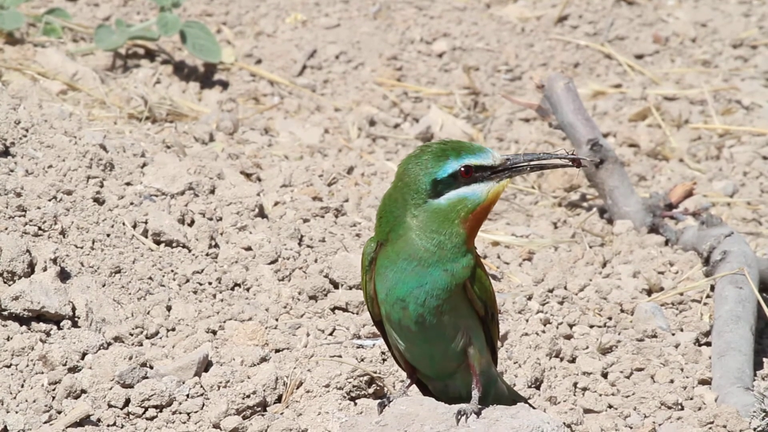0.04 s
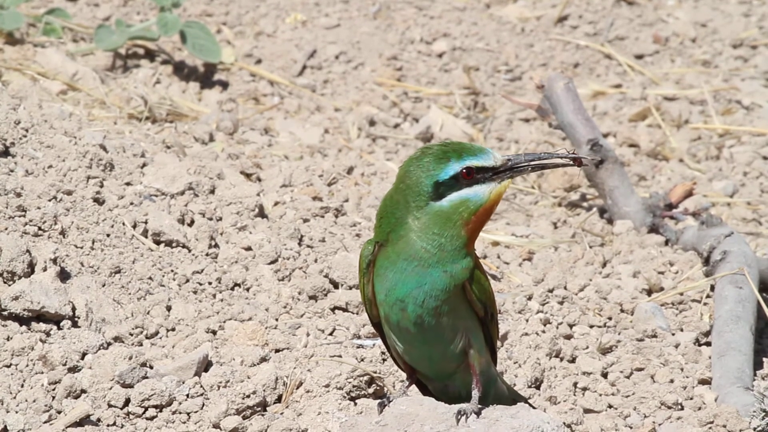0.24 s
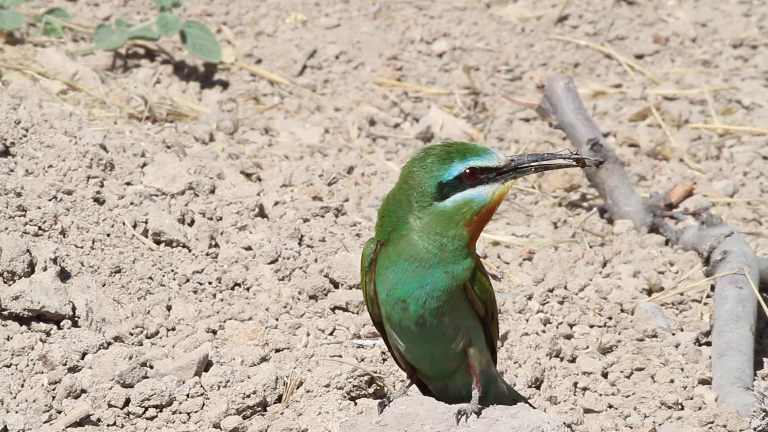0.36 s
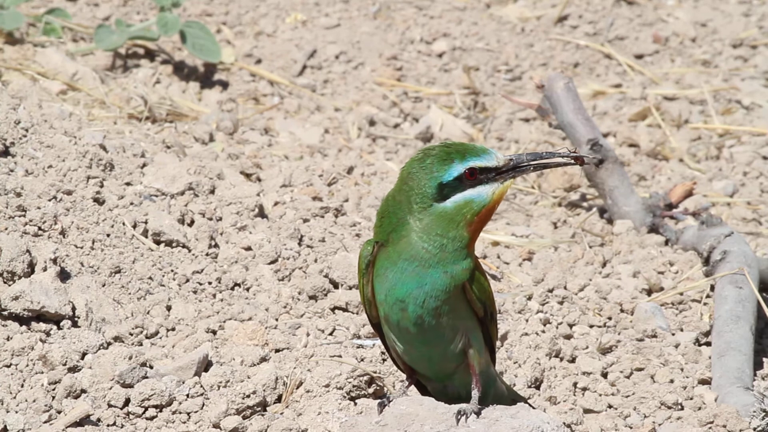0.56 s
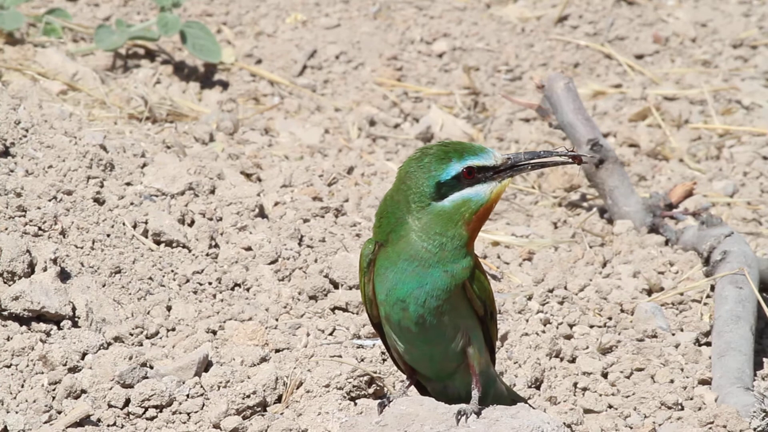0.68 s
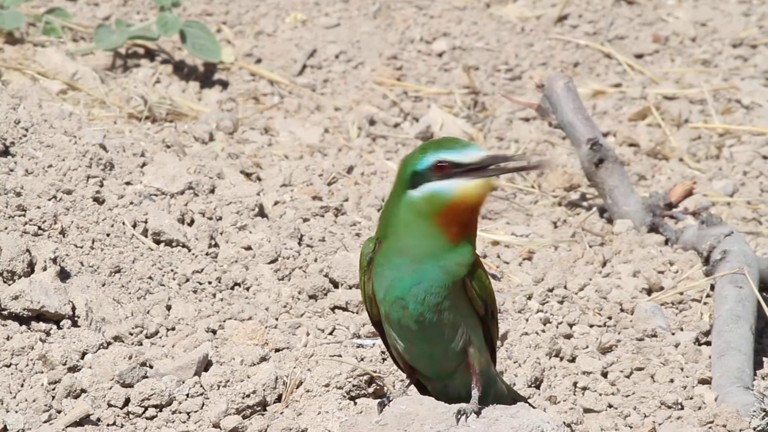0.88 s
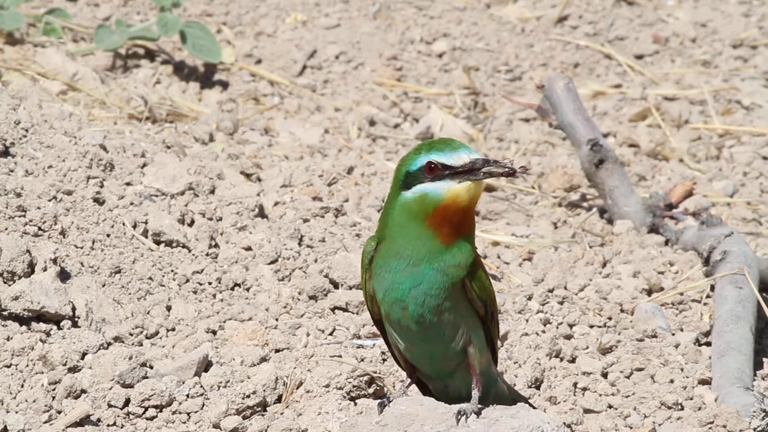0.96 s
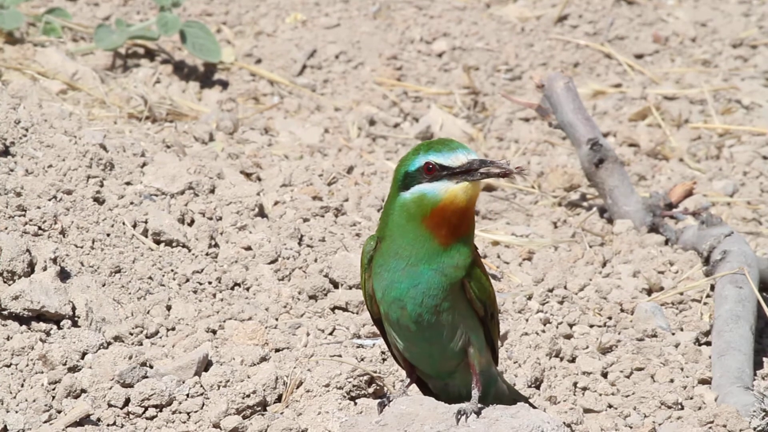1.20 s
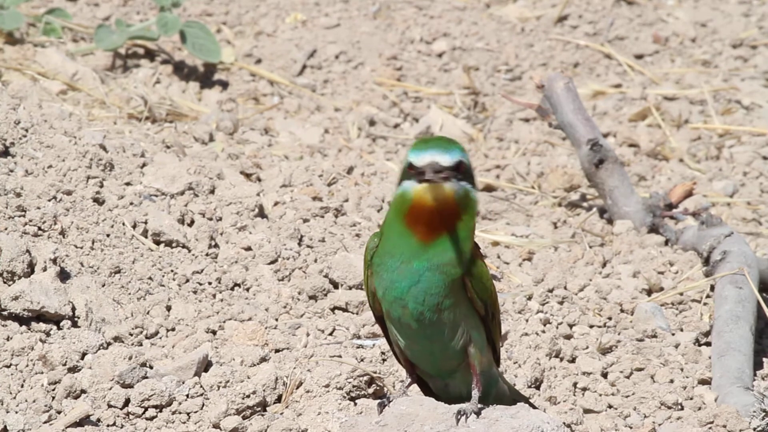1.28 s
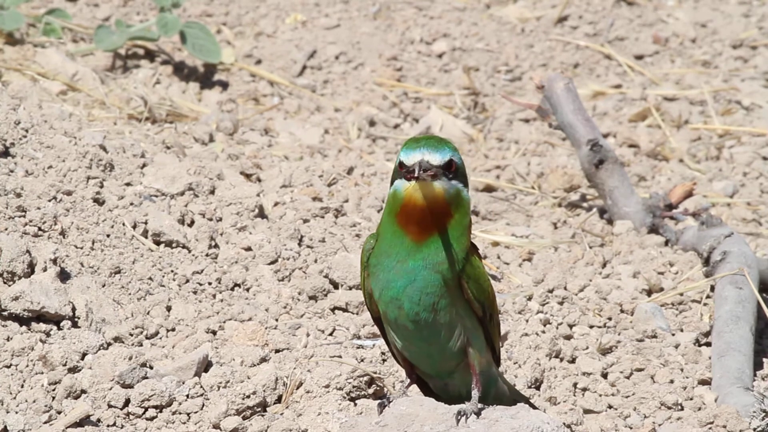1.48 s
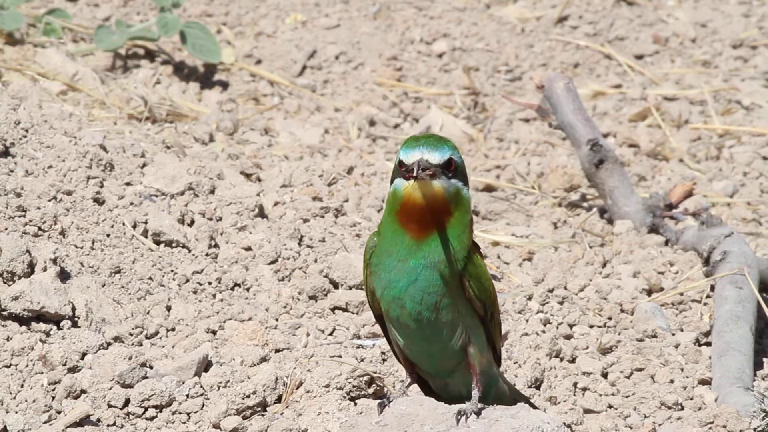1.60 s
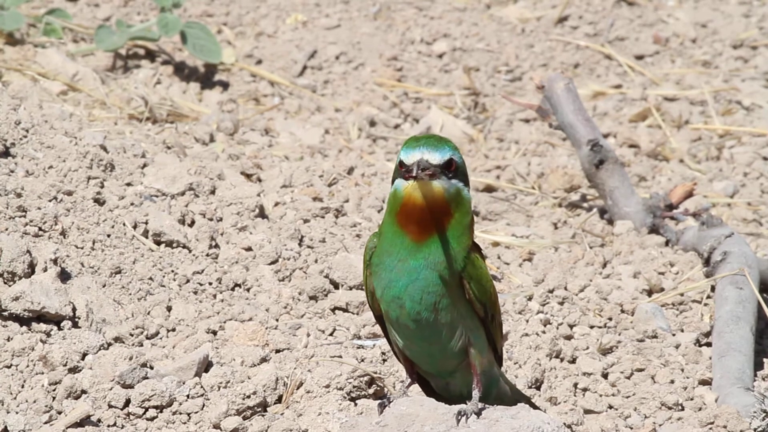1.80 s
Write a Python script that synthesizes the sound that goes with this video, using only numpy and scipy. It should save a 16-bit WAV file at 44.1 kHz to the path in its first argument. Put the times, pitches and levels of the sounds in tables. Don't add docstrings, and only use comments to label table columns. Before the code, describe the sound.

Close small bird sings three pairs of short raspy chirps, arcing up and down; between them a bee-eater gives two lower rolled whistles, with fainter answers and distant flock twitter, in a dry open field, mono microphone.

```python
import sys
import numpy as np
from scipy import signal
from scipy.fft import rfft, irfft
from scipy.io import wavfile
from scipy.ndimage import uniform_filter1d

SR = 44100
rng = np.random.default_rng(int(sys.argv[2]) if len(sys.argv) > 2 else 0)


def unload_wav(signal):
    wavfile.write(
        sys.argv[1],
        SR,
        np.round(np.clip(np.atleast_2d(signal).T, -1, 1) * 32767).astype(np.int16),
    )


def makeup_ratio(level_db):
    decades = np.asarray(level_db, float) / 20
    return 10 ** decades


N = 81585


def unit(x):
    return x / np.sqrt(np.mean(x ** 2))


def wobble(hz):
    k = max(int(SR / hz), 1)
    once = uniform_filter1d(rng.standard_normal(N), k)
    return unit(uniform_filter1d(once, k))


def coloured(points):
    hz, db = np.array(points).T
    f = np.maximum(np.arange(N // 2 + 1) * SR / N, 1)
    gain = makeup_ratio(np.interp(np.log(f), np.log(hz), db, right=-90))
    return unit(irfft(rfft(rng.standard_normal(N)) * gain, N))


def sing(hz, db, orders, breath=0.33):
    phase = 2 * np.pi * np.cumsum(hz) / SR
    over = 0
    for k, overtone_db in orders:
        dull = np.where((k > 5) & (k * hz < 10500), makeup_ratio(-12), 1)
        audible = k * hz < 15600
        strength = makeup_ratio(overtone_db) * (1 + breath * wobble(820))
        over = over + strength * np.sin(k * phase) * audible * dull
    return np.sqrt(2) * makeup_ratio(db) * (np.sin(phase) + over)


def track(t, rows, smooth_s=0.0032):
    s, hz, db = np.array(rows).T
    k = int(smooth_s * SR)
    pitch = np.interp(t, s, hz)
    level = np.interp(t, s, db, -120, -120)
    return uniform_filter1d(pitch, k), uniform_filter1d(level, k)


def field_air():
    # (frequency [Hz], level [dB per Hz])
    air_spectrum = [(21, -48), (35, -4.5), (1050, -12.5), (1800, -9), (2640, -7.5), (5680, -9.5),
                    (6970, -43), (15800, -22)]
    return makeup_ratio(-55 + .5 * wobble(5.5)) * coloured(air_spectrum)


def flock(t, count=260):
    # (time [s], level [dB])
    flock_level = [
        (0, -44.5),
        (.15, -49),
        (.7, -40.5),
        (1.1, -40),
        (1.2, -45.5),
        (1.27, -48),
        (1.62, -41),
        (1.72, -41.5),
        (1.85, -38),
    ]
    lowest_hz, span_hz, cheep_s, sweep_hz = 3300, 2990, 0.01, 881
    out = np.zeros(N + SR)
    g = np.arange(int(4 * cheep_s * SR)) / SR - 2 * cheep_s
    swell = np.exp(-(g / cheep_s) ** 2 * 2)
    for at, pitch, slope, size in rng.random((count, 4)):
        hz = lowest_hz + span_hz * pitch + sweep_hz * (2 * slope - 1) * g / cheep_s
        i = int(at * N)
        out[i:i + len(g)] += makeup_ratio(3.5 * size) * swell * np.sin(2 * np.pi * np.cumsum(hz) / SR)
    blur = coloured([(2300, -19.5), (3300, -3.0), (4200, 1.5), (5800, -0.5), (6500, -10),
                     (7500, -16.5), (12000, -17.5), (15500, -34)])
    chatter = unit(unit(out[:N]) + makeup_ratio(4) * blur)
    level_db = np.interp(t, *np.array(flock_level).T) + 2.8 * wobble(13.4)
    return makeup_ratio(level_db) * chatter


def bee_eaters(t):
    # (time [s], pitch [Hz], level [dB])
    rolls = [
        [(.56, 1224, -44), (.566, 1456, -37.5), (.578, 1682, -23), (.6, 1902, -18), (.62, 1836, -20),
         (.678, 1864, -22), (.687, 1656, -27.5), (.696, 940, -55)],
        [(.868, 1295, -42.5), (.876, 1654, -23), (.903, 1866, -12.5), (.923, 1869, -20.5), (.955, 1910, -23),
         (.982, 1844, -28), (.993, 1600, -29.5), (1.004, 950, -59)],
    ]
    # (time [s], rise [Hz], half width [s], swell [dB])
    flips = [
        (.607, 260, .005, 2),
        (.634, 220, .004, 4),
        (.643, 250, .004, 4),
        (.659, 140, .003, 3),
        (.651, 0, .0015, -12),
        (.914, 370, .005, 6),
        (.94, 250, .004, 9),
        (.949, 330, .0045, 10),
        (.963, 200, .004, 2),
        (.572, 0, .002, -8),
    ]
    # (multiple of pitch, level [dB])
    roll_overtones = [(2, -24), (3, -34), (6, -40), (7, -35), (8, -38)]
    # (time [s], pitch [Hz], level [dB])
    answers = [
        [(.76, 1245, -50), (.772, 1738, -36.5), (.797, 2604, -32.5), (.806, 2220, -46), (.82, 1702, -46.5),
         (.85, 1512, -39.5), (.96, 1572, -51), (.99, 1540, -48)],
        [(.995, 1580, -35), (1.013, 1753, -37), (1.018, 2315, -31), (1.026, 1820, -29.5), (1.04, 1722, -32.5),
         (1.046, 1510, -52), (1.058, 970, -56)],
        [(1.783, 1233, -52), (1.795, 1756, -38), (1.818, 2550, -26.5), (1.828, 2220, -51), (1.85, 1660, -44)],
    ]
    # (time [s], pitch [Hz], level [dB])
    far_whistles = [
        [(1.572, 1817, -59), (1.59, 1442, -56.5), (1.7, 1756, -56.5)],
        [(.09, 1780, -56), (.136, 1937, -60), (.147, 1684, -49), (.162, 1450, -60), (.215, 1524, -61)],
        [(0, 1483, -62.5), (.075, 1590, -63)],
        [(1.05, 3170, -44), (1.063, 3364, -32.5), (1.069, 3445, -23), (1.082, 4124, -35), (1.088, 3060, -47),
         (1.1, 2950, -40)],
        [(1.15, 4010, -46), (1.165, 4050, -41), (1.19, 3950, -49)],
        [(1.7, 5750, -58), (1.715, 5260, -53), (1.74, 4570, -35)],
    ]
    flip_hz, flip_db = 0, 0
    for s, rise_hz, half_width, swell_db in flips:
        bump = np.exp(-((t - s) / half_width) ** 2)
        flip_hz = flip_hz + bump * rise_hz
        flip_db = flip_db + bump * swell_db
    out = 0
    for rows in rolls:
        hz, db = track(t, rows)
        rolled_hz = (hz + flip_hz) * (1 + 0.0082 * wobble(300))
        rolled_db = db + flip_db + 1.9 * wobble(193)
        out = out + sing(rolled_hz, rolled_db, roll_overtones, breath=0.97)
    for rows in answers + far_whistles:
        hz, db = track(t, rows)
        out = out + sing(hz * (1 + 0.00555 * wobble(286)), db + 2.5 * wobble(150), [(1.1, -22)])
    return out


def scrub_notes(t):
    # (start [s], length [s], from [Hz], to [Hz], level [dB])
    brief_notes = [(0.179, 0.014, 4700, 4480, -44), (0.922, .035, 3750, 3705, -46),
                   (0.954, .024, 3500, 6800, -47), (1.031, .014, 3450, 3400, -35),
                   (1.396, 0.027, 3750, 3740, -39), (1.467, 0.027, 3780, 3750, -44),
                   (1.506, 0.038, 3760, 3750, -38.5), (1.524, 0.011, 4400, 4400, -35),
                   (1.548, 0.0097, 3800, 3660, -36), (1.585, .02, 4800, 4770, -38),
                   (.34, .025, 1600, 2600, -54), (.372, 0.034, 2500, 1460, -61),
                   (0.402, 0.061, 1400, 1490, -64.5), (0, 0.031, 360, 357, -59.5),
                   (0.44, 0.038, 5700, 5400, -39), (.455, 0.016, 4000, 3900, -31),
                   (0.909, 0.0184, 900, 610, -54), (1.536, 0.027, 2210, 2720, -54)]
    waver = 1 + 0.01187 * wobble(305)
    flutter_db = 2.3 * wobble(180)
    out = 0
    for s, length, from_hz, to_hz, db in brief_notes:
        u = np.clip((t - s) / length, 0, 1)
        hz = (from_hz + (to_hz - from_hz) * u) * waver
        out = out + np.sin(np.pi * u) ** 0.73 * sing(hz, db + flutter_db, [])
    return out


def rasps(t):
    # (start [s], loudest [s], end [s])
    rasp_times = [
        (.203, .24, .3),
        (.3, .345, .415),
        (.43, .465, .51),
        (.748, .788, .85),
        (.85, .895, .96),
        (.96, 1.0, 1.04),
        (1.29, 1.335, 1.41),
        (1.41, 1.445, 1.51),
        (1.51, 1.55, 1.6),
    ]
    rasp_peaks = [-33.5, -31.5, -41.5, -35.5, -34, -48, -34.5, -34, -46]
    # (frequency [Hz], level [dB per Hz])
    hiss_spectrum = [(1470, -60), (2500, -27.5), (3910, -3.5), (5710, -1), (8790, -12.5), (12500, -9),
                     (15800, -14.5)]
    rest_hz, entry_hz, dip_hz, top_hz = 3800, 3300, 3116, 5400
    bend_hz = np.array([rest_hz, dip_hz, top_hz, top_hz, rest_hz]) - rest_hz
    lead = np.zeros(N)
    late = np.ones(N)
    db = np.full(N, -120.)
    hz = np.full(N, 1. * rest_hz)
    for (a, b, c), peak_db in zip(rasp_times, rasp_peaks):
        corners = [a - .015, a, b, b + 0.032, c, c + 0.032]
        shape_db = peak_db + np.array([-26, -12, 0, -7, -12, -28])
        db = np.maximum(db, np.interp(t, corners, shape_db, -120, -120))
        lead = lead + np.interp(t, [a - .015, a - .008, b + 0.028, b + 0.033], [0, 1, 1, 0])
        late = late - np.interp(t, [a - .03, a - .015, a + .02], [0, .8, 0])
        hz = hz + np.interp(t, b + np.array([-.02, -.007, .018, .03, .035]), bend_hz)
        hz = hz + (entry_hz - rest_hz) * np.interp(t, [a - .02, a - .015, a + .012], [0, 1, 0])
    unsteady_hz = hz * (1 + .045 * wobble(1470) + .025 * wobble(150.5))
    voice = sing(unsteady_hz, 2 * wobble(300), [(2, 3.5), (3, -3.5), (4, -11)])
    hiss = coloured(hiss_spectrum)
    high_pass = signal.butter(2, 8300, "high", fs=SR, output="sos")
    treble = signal.sosfiltfilt(high_pass, hiss)
    hiss_gain = makeup_ratio(2 - 0.64 * lead + 1.0 * wobble(200))
    return makeup_ratio(db) * (lead * unit(voice) + hiss_gain * (hiss - (1 - late) * treble))


def chirps(t):
    # (top time [s], top pitch [Hz], level [dB], rise [s], fall [s])
    arcs = [
        (.265, 5580, -21, 0.023, .031),
        (.38, 5430, -23.5, 0.028, 0.027),
        (.812, 5400, -25.5, .027, 0.03),
        (.925, 5350, -25, 0.034, 0.026),
        (1.363, 5700, -21, 0.024, .041),
        (1.48, 5250, -26.5, 0.035, 0.033),
        (1.0, 5300, -28.5, 0.012, 0.03),
        (0.89, 5700, -40.5, 0.029, .035),
    ]
    # (top time [s], top pitch [Hz], level [dB], rise [s], fall [s])
    upper_voices = [
        (.378, 5750, -24.5, 0.033, 0.036),
        (.815, 5960, -31.5, .028, 0.044),
        (.925, 5750, -25.5, 0.027, 0.025),
        (1.386, 5780, -26.5, .022, 0.019),
        (1.36, 5960, -32, .026, 0.037),
        (1.48, 5695, -24.5, .027, 0.028),
    ]
    # (time [s], pitch [Hz], level [dB])
    pips = [
        [(.24, 4720, -39), (.25, 5800, -29), (.259, 6420, -22.5), (.27, 6130, -27), (.286, 5800, -26.5),
         (.3, 5640, -43)],
        [(.455, 3300, -42), (.466, 3507, -39.5), (.477, 4310, -36), (.483, 4540, -31), (.494, 4600, -46)],
        [(.994, 3500, -39), (1.003, 4430, -33.5), (1.013, 4706, -26.5), (1.024, 3600, -36), (1.028, 3400, -48)],
        [(1.548, 3500, -43), (1.56, 4220, -41), (1.569, 4720, -29.5), (1.582, 4810, -33.5), (1.587, 4680, -47)],
    ]
    # (multiple of pitch, level [dB])
    chirp_overtones = [(1.5, -26), (2, -19.5)]
    hoarse = abs(t - .812) < .022
    notes = [track(t, rows) for rows in pips]
    for voices, bend, more in ((arcs, 2.5, 1), (upper_voices, 4.5, 2.8)):
        for s, top_hz, db, rise, fall in voices:
            u = np.minimum(np.where(t < s, (s - t) / rise, (t - s) / fall), 1.3)
            fade_db = more * np.where(t < s, 0.67, 1) * 15 * u ** bend
            fade_db = fade_db + 300 * np.maximum(u - 1, 0)
            hz = top_hz - 2010 * np.minimum(u, 1.1) ** bend
            notes.append((hz, db - fade_db))
    out = 0
    for hz, db in notes:
        sweep = np.clip(np.gradient(hz) / 2, -1, 1)
        rough = 1 + hoarse + 1.2 * np.maximum(sweep, 0)
        orders = [(k, g + 9 * np.minimum(sweep, 0)) for k, g in chirp_overtones]
        undertone_db = -24 - 30 * np.clip(1 - (hz - 5200) / 400, 0, 1)
        orders.append((.5, undertone_db))
        jittered_hz = hz * (1 + .008 * (rough + hoarse) * wobble(422))
        uneven_db = db + (1.5 + 2 * hoarse) * wobble(230)
        tone = sing(jittered_hz, uneven_db, orders)
        out = out + tone * (1 + .3 * rough * wobble(2000))
    return out


def ground_path(x):
    # (centre [Hz], half width [Hz], gain [dB])
    interference = [(3250, 150, 4), (3950, 190, 6), (4280, 120, -6), (4600, 160, 8), (5020, 160, -6),
                    (5600, 300, 2), (6100, 140, -6), (6550, 200, 4), (7850, 250, 4), (8700, 200, -3),
                    (10250, 300, -6), (11000, 400, 3), (12400, 600, 4), (13550, 200, -10)]
    f = np.arange(N // 2 + 1) * SR / N
    gain_db = sum(db * np.exp(-((f - hz) / w) ** 2) for hz, w, db in interference)
    return irfft(rfft(x) * makeup_ratio(gain_db), N)


def wind(t):
    # (start [s], level [dB], decay [s])
    soft_puffs = [
        (.666, -42.5, .018),
        (.46, -57, .02),
        (1.64, -55, .012),
        (.745, -52, .01),
        (1.001, -42, .011),
    ]
    env = 0
    for s, db, decay in soft_puffs:
        env = env + makeup_ratio(db) * (t > s) * np.exp(-np.maximum(t - s, 0) / decay)
    return uniform_filter1d(env, 90) * coloured([(40, -12), (280, 0), (600, -10), (1200, -30)])


def scrub_echo(birds, t):
    lag = t[:SR // 3]
    tail = rng.standard_normal(len(lag)) * makeup_ratio(-60 * lag / .22) * (lag > .006)
    tail = tail / np.sqrt(np.sum(tail ** 2))
    return makeup_ratio(-20) * signal.fftconvolve(birds, tail)[:N]


def scene():
    t = np.arange(N) / SR
    small_bird = ground_path(chirps(t) + rasps(t))
    birds = bee_eaters(t) + small_bird + scrub_notes(t)
    mono = birds + scrub_echo(birds, t) + flock(t) + wind(t) + field_air()
    return np.array([mono, mono])


def band_limit(x):
    return signal.sosfilt(signal.butter(12, 15940, fs=SR, output="sos"), x)


def record(dry):
    return band_limit(dry)


dry = scene()
out = record(dry)
unload_wav(out)
```